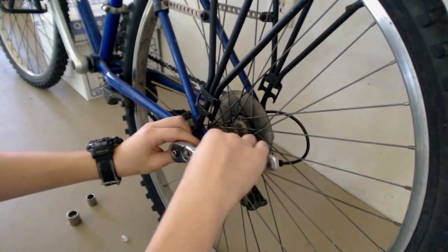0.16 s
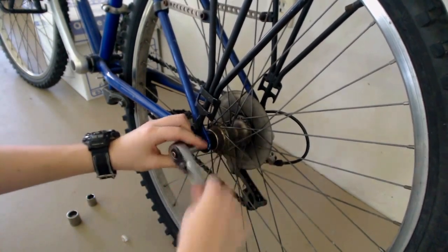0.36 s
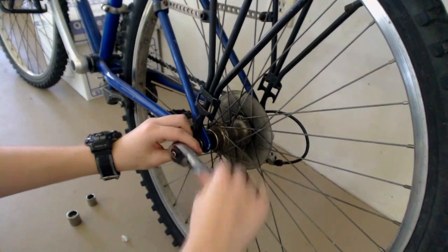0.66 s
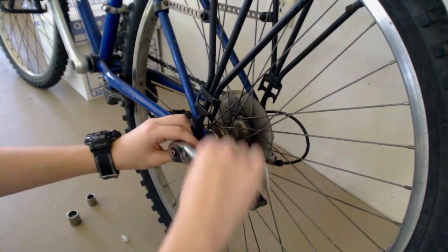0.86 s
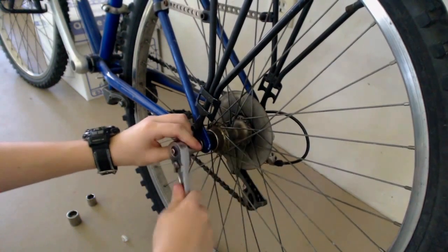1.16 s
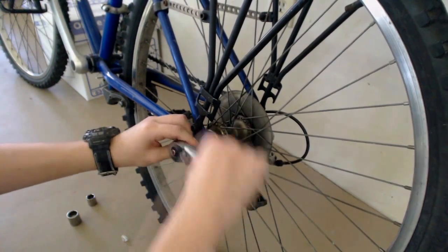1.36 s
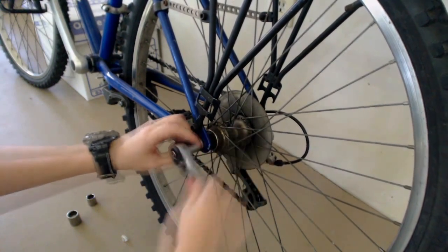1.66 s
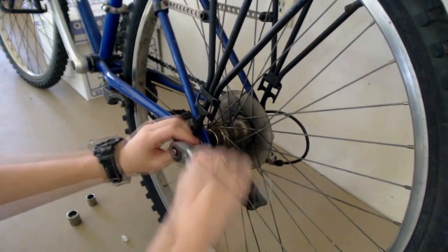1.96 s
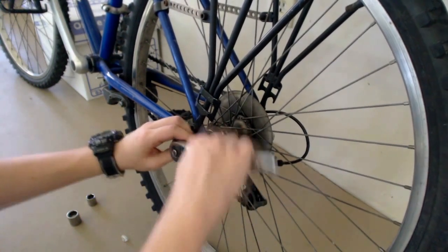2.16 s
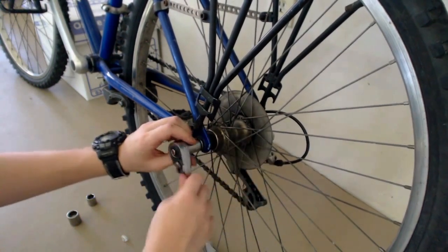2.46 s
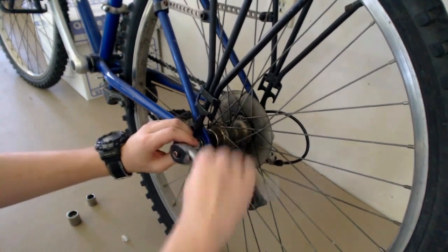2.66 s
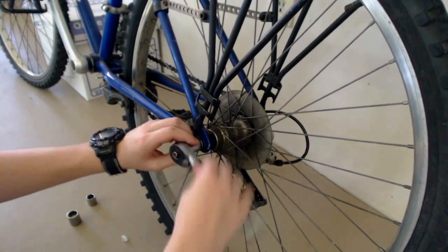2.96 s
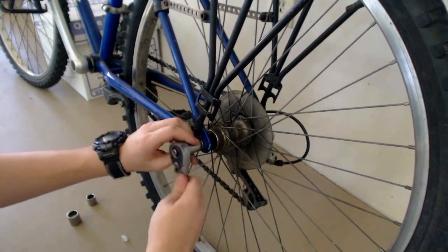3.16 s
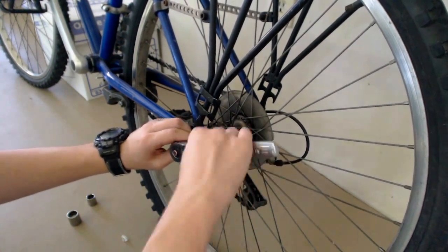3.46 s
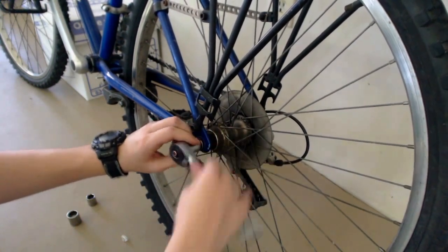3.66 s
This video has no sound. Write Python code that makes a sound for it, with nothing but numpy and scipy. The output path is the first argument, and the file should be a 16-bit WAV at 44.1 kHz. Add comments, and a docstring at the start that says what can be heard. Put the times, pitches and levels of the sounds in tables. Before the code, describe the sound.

A ratchet wrench, close in a small hard room, clicks in six bursts at about 0.17-0.32, 0.76-0.91, 1.37-1.57, 2.27-2.41, 2.88-3.02 and 3.47-3.62 s. Each is seven to ten bright, dry steel snaps, slowing at the end. A clear socket knock lands at 1.80, a lone click at 1.86. Gaps hold fainter knocks, soft bumps, finger ticks and hand rubbing over quiet room air and low hum.

```python
"""A ratchet wrench tightens a bicycle's axle nut in a small hard room. On six back swings the pawl snaps
over the teeth, with one lone snap in between; each snap is short noise and decaying tones in three
layers: steel, axle and frame. Between swings the socket knocks on the nut, built the same way but duller.
Soft bumps, faint finger ticks and rubbing hands are shaped noise. Below lie noise for the room air and
a low, slightly unsteady sine hum; fading noise tails make the walls answer."""
import sys
import numpy as np
from scipy import signal
from scipy.fft import rfft, irfft, next_fast_len
from scipy.io import wavfile

SR = 44100
rng = np.random.default_rng(int(sys.argv[2]) if len(sys.argv) > 2 else 0)


def put_to_file(sound):
    """Save the sound as 16-bit audio at rate SR, in the file named by the first command-line argument."""
    columns = np.atleast_2d(sound).T  # one column per channel
    safe = np.clip(columns, -1, 1)
    whole_steps = np.round(safe * 32767)
    wavfile.write(sys.argv[1], SR, whole_steps.astype(np.int16))


N = 167580  # length in samples, 3.8 s

# Levels in the tables are starting values: layer trims, the room and the microphone act on them later.
# pawl snaps, one per tooth: (time [s], steel level [dB], axle level [dB], frame level [dB],
# axle's raised resonance [Hz])
PAWL_SNAPS = [(0.1705, -34, -43.5, -50, 1770), (0.1908, -29.5, -34, -36.5, 1510),
              (0.2095, -29, -38.5, -41.5, 1420), (0.2247, -31.5, -35, -44, 1180),
              (0.2378, -29, -32, -36, 1020), (0.2593, -30, -31.5, -37.5, 1410),
              (0.287, -28, -29.5, -35.5, 1040), (0.3235, -29, -35, -48, 1100),
              (0.7622, -30.5, -45.5, -67, 1810), (0.786, -30, -39, -53.5, 1370),
              (0.8048, -34, -37.5, -45, 1630), (0.8216, -27, -33, -39.5, 1410),
              (0.8435, -26, -29, -41.5, 1190), (0.8713, -26, -32, -57, 1020),
              (0.913, -27.5, -37, -44, 1740), (1.3737, -27.5, -34.5, -46, 1700),
              (1.3953, -26, -30.5, -41, 1500), (1.4131, -26, -32.5, -49, 1500),
              (1.4313, -30, -32, -40.5, 1960), (1.45, -28.5, -27.5, -56, 1330),
              (1.4669, -28.5, -30.5, -38.5, 1400), (1.4843, -27, -28.5, -36, 1360),
              (1.5046, -30, -40, -40.5, 1330), (1.5325, -27.5, -35, -41.5, 1450),
              (1.5685, -30.5, -33, -46.5, 1420), (1.8588, -35.5, -48.5, -66, 1600),
              (2.2654, -29.5, -39.5, -51, 1484), (2.2815, -27, -32.5, -43.5, 1440),
              (2.2959, -28, -32, -50, 1470), (2.3111, -28.5, -37, -36, 1260),
              (2.3254, -31.5, -35.5, -30, 870), (2.3412, -31, -36, -34.5, 1030),
              (2.359, -29, -38, -34, 1360), (2.3798, -28.5, -36.5, -56, 1900),
              (2.4074, -28, -32, -64.5, 1250), (2.8849, -28.5, -34, -42, 1420),
              (2.9003, -27, -34.5, -36.5, 1560), (2.915, -26.5, -33.5, -41.5, 1210),
              (2.9316, -26.5, -37, -37.5, 1440), (2.9468, -28, -30, -39, 1380),
              (2.9637, -29, -31, -40, 1350), (2.9796, -29.5, -39, -63, 1440),
              (2.9992, -31, -34, -53.5, 2260), (3.0213, -29, -35.5, -74, 1610),
              (3.4652, -33.5, -37.5, -47, 1100), (3.4838, -33.5, -32.5, -40, 1160),
              (3.4995, -31.5, -35, -42, 940), (3.5131, -31, -39.5, -39.5, 1290),
              (3.5251, -28.5, -31, -31.5, 1140), (3.5383, -31, -39.5, -36, 1240),
              (3.5547, -31, -34, -50, 1930), (3.5742, -30.5, -39, -42, 1320),
              (3.5924, -31.5, -37, -57, 1410), (3.6218, -32, -39.5, -69, 1620)]
# the grip damps the frame differently on each swing: (start [s], frame's raised resonance [Hz])
SWING_GRIPS = [(.1, 650), (.7, 400), (1.3, 500), (2.2, 330), (2.8, 330), (3.4, 255)]
# contacts of the pawl as it seats, before random scatter: (time after the first [s], level [dB])
SEATING_CONTACTS = [(0, -3), (.00025, -6), (.0006, -4), (.0011, -15), (.00155, -4.5), (.0024, -8),
                    (.0037, -4.5)]
# the socket shifts on the nut: (time [s], level [dB], low, middle and high layer against it [dB] each,
# axle's raised resonance [Hz])
SOCKET_KNOCKS = [(.42, -50, -5.5, -3, -14, 1300), (.434, -44.5, -15, -21, -40, 1210),
                 (0.704, -51, -14, -5.5, -27, 1460), (1.068, -42, -7.5, -13.5, -15.5, 1530),
                 (1.1, -53, -11.5, -0.5, -32, 1650), (1.276, -37.5, -3.5, -5, -13, 2080),
                 (1.286, -49.5, -15.5, -9, -29, 1990), (1.8024, -27, -15, -12, -8, 890),
                 (2.175, -59.5, -17, 0, -9.5, 1500), (2.453, -38, -15, -5.5, -21, 940),
                 (2.719, -52.5, -26, -6.5, -7.5, 1420), (3.187, -48, -25, -11.5, -31, 1800),
                 (3.356, -55, -17, -2.5, -30, 1253)]
# soft bumps of handling: (time [s], peak level before BUMP_LIFT_DB [dB])
SOFT_BUMPS = [(0.035, -50.5), (1.596, -57), (1.811, -55.5), (2.329, -51), (3.082, -55.5), (3.31, -44),
              (3.44, -49.5), (3.595, -42.5), (3.67, -50.5)]
# faint ticks of fingers on the tool: (time [s], level before TICK_DB [dB])
FINGER_TICKS = [(0.038, -53.5), (0.091, -53.5), (0.504, -55.5), (0.569, -72), (0.641, -54.5), (1.239, -52),
                (1.677, -54), (1.707, -57), (2.086, -53.5), (2.554, -57), (2.62, -60), (2.757, -58),
                (3.153, -55.5), (3.78, -58)]

# tone colour of each sound: (frequency [Hz], relative level [dB])
STEEL_COLOUR = [(500, -38), (1200, -23.5), (2000, -8), (2800, -4.5), (3900, -2.5), (5000, -1.5),
                (6400, 3.5), (7000, -6), (8000, -20)]
AXLE_COLOUR = [(200, -40.5), (400, -24.5), (620, -9), (900, 0.5), (1400, -1.5), (2000, 1), (2600, -4),
               (4000, -17), (8000, -42)]
FRAME_COLOUR = [(100, -19), (190, -12), (260, -3.5), (380, 0), (480, -7), (640, 4), (800, -5.5),
                (1500, -35.5), (5000, -64)]
KNOCK_TOP_COLOUR = [(1000, -23.5), (2000, -4.5), (2900, 0), (4000, -3), (5150, 2.5), (6000, -3.5),
                    (7000, -11.5), (8000, -15)]
BUMP_COLOUR = [(25, -32), (60, -12.5), (120, 2.5), (170, -9.5), (260, -19.5), (600, -49), (3000, -68)]
RUSTLE_COLOUR = [(200, -30), (450, 6), (800, 3.5), (1300, 4.5), (2100, -2.5), (3200, -15), (7000, -36.5)]  # skin on the tool
AIR_COLOUR = [(25, -27), (40, -27.5), (58, -3), (85, -10), (115, 4.5), (184, -1.5), (370, -7.5),
              (500, -19.5), (750, -15), (1500, -27.5), (4300, -35), (5170, -30), (6000, -35), (8400, -54),
              (11000, -75.5)]

# ringing tones, before random scatter: (frequency [Hz], relative level [dB], time to fall 60 dB [s])
STEEL_TONES = [(3920, 2, .07), (4430, -9, .07), (4680, -3.5, 0.11), (4900, 3.5, .05), (5910, -6.5, .06),
               (5830, 0, 0.15), (6100, -2, 0.053)]
AXLE_TONES = [(880.7, -1.5, 0.11), (1077.5, -2, 0.073), (1176, -4, 0.1), (1421.4, 1, 0.071),
              (1696, -9, 0.087), (2197, -11, 0.048)]
FRAME_TONES = [(244.8, 1, 0.22), (371.7, 2.5, 0.11), (648.6, -1.5, 0.067)]

# how long the room's answer lasts: (frequency [Hz], time to fall 60 dB [s])
ROOM_DECAY = [(150, .25), (400, 0.077), (1000, 0.055), (2500, 0.1), (5500, .2), (9000, 0.13)]
# how strong the room's answer is: (frequency [Hz], level [dB])
ROOM_LEVEL = [(200, -8), (1000, -8), (2500, -6), (6000, -10)]
# stereo spread of the room's answer: (frequency [Hz], side gain over mid [ratio])
ROOM_WIDTH = [(100, .8), (500, .65), (1200, .4), (2200, .17), (6000, 0.13)]
# stereo balance: (frequency [Hz], left over right [dB])
LEFT_LEAN = [(50, -2.5), (120, -3.7), (260, -7.5), (500, -6), (1000, -5), (1800, -2), (3000, .3),
             (7000, .4)]
# the microphone's treble: (frequency [Hz], level [dB])
MIC_TREBLE = [(7600, -1), (8200, -2.5), (8700, -21), (9200, -23), (12000, -34), (13300, -41.5)]

T = np.arange(SR // 5) / SR  # time axis of one short sound, 0.2 s
LEVEL_S = 0.012  # duration to which the level of a short sound refers

SNAP_DB, SNAP_SCATTER = 18, 0.12  # snap gain in the steel layer; relative scatter of contact times
STEEL_DB, AXLE_DB, FRAME_DB = -3, -3.5, -2  # layer trims
PAWL_HZ, PAWL_WIDTH_HZ, PAWL_DB = 3980, 200, -5  # the pawl's own resonance
AXLE_PEAK_DB, AXLE_WIDTH_HZ = 8, 260
FRAME_PEAK_DB, FRAME_WIDTH_HZ = 4, 148
SLIDE_S, SLIDE_DB = 0.0038, -24.5  # the scrape before a snap, its level against the steel level
BOUNCE_S, BOUNCE_DB = 0.003036, 1  # the floor throws the axle's sound back
KNOCK_FRAME_HZ, KNOCK_PEAK_DB, KNOCK_WIDTH_HZ = 565, 14, 370

BUMP_LIFT_DB, TICK_DB = 7, -9.5
RUSTLE_DB, RUSTLE_SWING_DB, RUSTLE_RATE_HZ = -69.5, 6, 22
AIR_DB, AIR_WIDTH = -60.5, 0.13
HUM_DB, HUM_HZ, HUM_DRIFT_RAD = -67, 118.5, 0.66
ROOM_DELAY_S = 0.0065
TOP_HZ = 13300  # nothing passes from here up


def amp(db):
    """Turn decibels into gain."""
    return 10 ** (np.asarray(db) / 20)


def unit(x):
    """Scale to an average strength (rms) of 1."""
    return x / np.sqrt(np.mean(x ** 2) + 1e-20)


def along(points, hz):
    """Read values between (frequency, value) points, with frequency on a log axis."""
    f, v = np.transpose(points)
    return np.interp(np.log(hz + 1), np.log(f + 1), v)


def filtered(x, response):
    """Multiply each frequency of a full-length sound by a gain."""
    m = next_fast_len(N + SR // 2)
    return irfft(rfft(x, m) * response(np.fft.rfftfreq(m, 1 / SR)), m)[..., :N]


def causal(points, size=16384):
    """Build a filter with the given colour that responds only after it is struck."""
    log_gain = np.log(amp(along(points, np.fft.rfftfreq(size, 1 / SR))))
    c = irfft(log_gain)
    c[1:size // 2] *= 2
    c[size // 2 + 1:] = 0
    return np.exp(rfft(c))


def peaked(response, hz, width_hz, db):
    """Add one resonance to a filter, db being its strength against the filter's own gain."""
    f = np.linspace(0, SR / 2, len(response))
    damping = 1j * f * width_hz
    return response * (1 + amp(db) * damping / (hz * hz - f * f + damping))


def shaped(x, response):
    """Filter a short sound, then give it the energy of rms 1 lasting LEVEL_S."""
    y = irfft(rfft(x, 2 * (len(response) - 1)) * response)[:len(T)]
    return y / np.sqrt(np.sum(y ** 2) / (LEVEL_S * SR) + 1e-20)


def fade(t60, t=T):
    """Die away smoothly, falling 60 dB in t60 seconds."""
    return np.exp(-np.log(1000) * t / t60)


def rattle(rise_s, t60):
    """Dense vibration: noise that swells quickly and dies away."""
    return rng.standard_normal(len(T)) * (1 - np.exp(-T / rise_s)) * fade(t60)


def ring(tones):
    """Sum decaying tones, struck with a new strength and phase each time."""
    total = np.zeros(len(T))
    for hz, db, t60 in tones:
        strength = amp(db + 2 * rng.normal())
        total += strength * fade(t60) * np.sin(2 * np.pi * (hz * T + rng.random()))
    return total


def add(track, s, sound):
    """Lay a sound into a track at time s."""
    i = int(np.clip(round(s * SR), 0, N - 1))
    track[i:i + len(sound)] += sound[:N - i]


def room_air():
    """Steady coloured noise, mostly in the middle with a little stereo spread."""
    mid, side = unit(filtered(rng.standard_normal((2, N)), lambda hz: amp(along(AIR_COLOUR, hz))))
    return amp(AIR_DB) * (mid + AIR_WIDTH * np.array([side, -side]))


def hum():
    """A low sine whose phase drifts slowly, so it is slightly unsteady."""
    drift = unit(filtered(rng.standard_normal(N), lambda hz: np.exp(-hz / 5)))
    phase = 2 * np.pi * HUM_HZ * np.arange(N) / SR + HUM_DRIFT_RAD * drift
    return amp(HUM_DB) * unit(np.sin(phase))


def room(x, count=6):
    """The walls answer with fading noise tails, a new one for each of six equal stretches."""
    out = np.zeros(N)
    for part in np.array_split(np.arange(N), count):
        hz, t, z = signal.stft(rng.standard_normal(SR // 2), SR, nperseg=256)
        t60 = along(ROOM_DECAY, hz)
        z = z * fade(t60[:, None], t)
        # long decays would carry more energy: even that out
        z *= (amp(along(ROOM_LEVEL, hz)) / np.sqrt(t60 * SR / (2 * np.log(1000))))[:, None]
        tail = signal.istft(z, SR, nperseg=256)[1]
        add(out, part[0] / SR + ROOM_DELAY_S, signal.fftconvolve(x[part], tail))
    return out


def rustle():
    """Hands rub on the tool and frame: noise whose loudness follows an uneven pressure."""
    pressure = unit(filtered(rng.standard_normal(N), lambda hz: np.exp(-hz / RUSTLE_RATE_HZ)))
    rub = unit(filtered(rng.standard_normal(N), lambda hz: amp(along(RUSTLE_COLOUR, hz))))
    return amp(RUSTLE_DB + RUSTLE_SWING_DB * pressure) * rub


def bumps():
    """Soft handling bumps: low noise that swells gently, set by its peak."""
    out = np.zeros(N)
    soft = causal(BUMP_COLOUR)
    for s, db in SOFT_BUMPS:
        push = shaped(rattle(rise_s=0.036, t60=0.08), soft)
        add(out, s, amp(db + BUMP_LIFT_DB) * push / np.abs(push).max())
    return out


def finger_ticks():
    """Fingers tick on the tool: brief noise with the axle's colour."""
    out = np.zeros(N)
    axle = causal(AXLE_COLOUR)
    for s, db in FINGER_TICKS:
        add(out, s, amp(db + TICK_DB) * shaped(rattle(rise_s=0.0012, t60=0.04), axle))
    return out


def knocks():
    """The socket takes up its play: duller contacts shake the frame, the axle and a bright top."""
    out = np.zeros(N)
    top, axle = causal(KNOCK_TOP_COLOUR), causal(AXLE_COLOUR)
    frame = peaked(causal(FRAME_COLOUR), KNOCK_FRAME_HZ, FRAME_WIDTH_HZ, FRAME_PEAK_DB)
    for s, db, low_db, mid_db, high_db, hz in SOCKET_KNOCKS:
        tubes = rattle(rise_s=0.002, t60=0.08) + amp(-28) * ring(FRAME_TONES)
        hub = rattle(rise_s=0.0017, t60=0.047) + amp(-22.5) * ring(AXLE_TONES)
        low = shaped(tubes, frame)
        mid = shaped(hub, peaked(axle, hz, KNOCK_WIDTH_HZ, KNOCK_PEAK_DB))
        high = shaped(rattle(rise_s=0.001, t60=0.049), top)
        add(out, s, amp(db) * (amp(low_db) * low + amp(mid_db) * mid + amp(high_db) * high))
    return out


def snap():
    """The pawl hits a tooth and chatters into its seat: a few single-sample clicks."""
    y = np.zeros(len(T))
    for s, db in SEATING_CONTACTS:
        moment = abs(s * (1 + SNAP_SCATTER * rng.normal()))
        y[int(moment * SR)] += amp(db + 2 * rng.normal())
    return y


def ratchet():
    """The pawl scrapes up each tooth and drops, ringing the steel and shaking the axle and frame."""
    out = np.zeros(N)
    steel, axle, frame = causal(STEEL_COLOUR), causal(AXLE_COLOUR), causal(FRAME_COLOUR)
    pawl = peaked(steel, PAWL_HZ, PAWL_WIDTH_HZ, PAWL_DB)
    starts, frame_hz = np.transpose(SWING_GRIPS)
    for s, steel_db, axle_db, frame_db, axle_hz in PAWL_SNAPS:
        # the scrape grows until the pawl drops
        slide = rng.standard_normal(len(T)) * T * (T < SLIDE_S)
        add(out, s - SLIDE_S, amp(steel_db + SLIDE_DB) * shaped(slide, steel))

        tool = amp(SNAP_DB) * snap() + rattle(rise_s=0.00038, t60=0.04) + amp(-24) * ring(STEEL_TONES)
        add(out, s, amp(steel_db + STEEL_DB) * shaped(tool, pawl))

        # the floor's answer is a later rattle of its own
        bounce = np.pad(rattle(rise_s=0.0024, t60=0.027), (int(BOUNCE_S * SR), 0))[:len(T)]
        hub = amp(14.5) * snap() + rattle(rise_s=0.0012, t60=0.1)
        hub += amp(BOUNCE_DB) * bounce + amp(-16) * ring(AXLE_TONES)
        axle_now = peaked(axle, axle_hz, AXLE_WIDTH_HZ, AXLE_PEAK_DB)
        add(out, s, amp(axle_db + AXLE_DB) * shaped(hub, axle_now))

        tubes = rattle(rise_s=0.003, t60=0.11) + amp(-23.5) * ring(FRAME_TONES)
        swing = np.searchsorted(starts, s) - 1
        held = peaked(frame, frame_hz[swing], FRAME_WIDTH_HZ, FRAME_PEAK_DB)
        add(out, s, amp(frame_db + FRAME_DB) * shaped(tubes, held))
    return out


def scene():
    """Tool and bicycle in the middle, the room around them; the low notes lean right."""
    close = ratchet() + knocks() + bumps() + finger_ticks() + rustle()
    mid = close + room(close)
    side = filtered(room(close), lambda hz: along(ROOM_WIDTH, hz))
    pair = np.array([mid + side, mid - side]) + room_air() + hum()

    def balance(hz):
        lean_db = along(LEFT_LEAN, hz)
        return 2 / (1 + amp(np.array([-lean_db, lean_db])))  # left, right
    return filtered(pair, balance)


def record(dry):
    """The microphone's treble falls steeply above about 8 kHz and stops at TOP_HZ."""
    return filtered(dry, lambda hz: amp(along(MIC_TREBLE, hz)) * (hz < TOP_HZ))


dry = scene()
out = record(dry)
put_to_file(out)
```